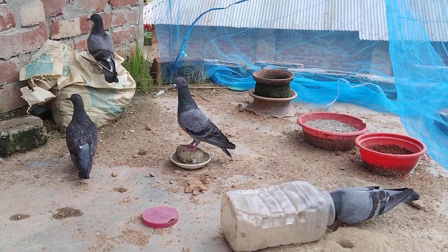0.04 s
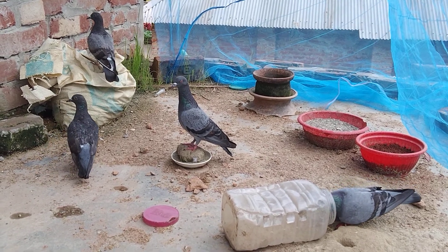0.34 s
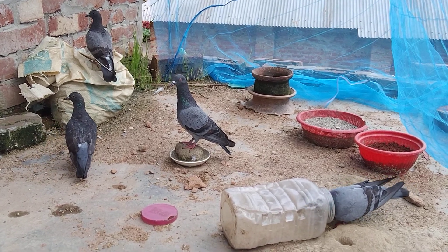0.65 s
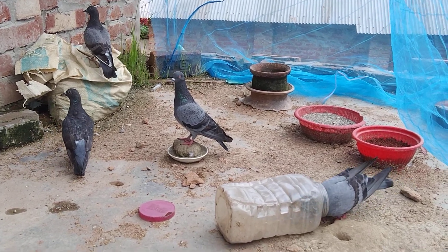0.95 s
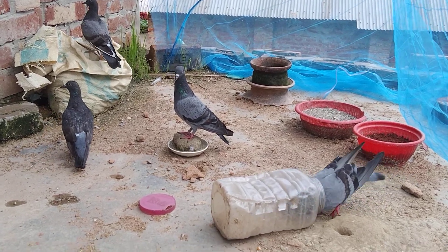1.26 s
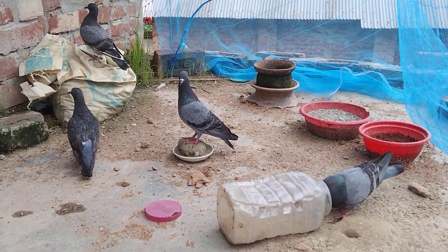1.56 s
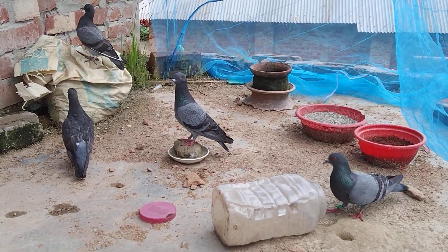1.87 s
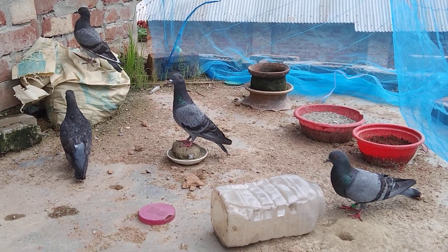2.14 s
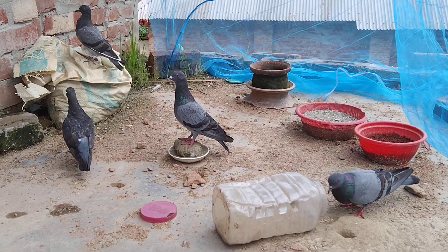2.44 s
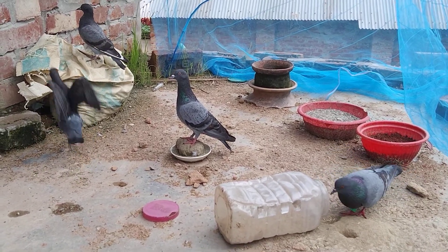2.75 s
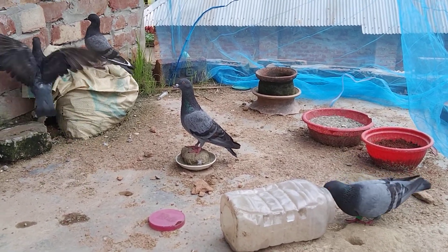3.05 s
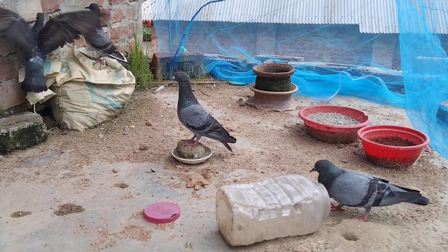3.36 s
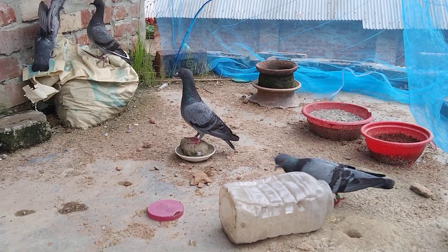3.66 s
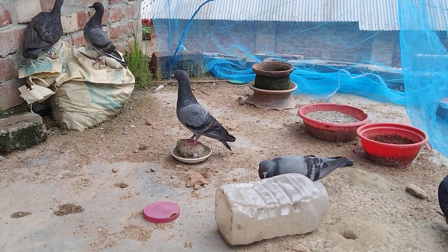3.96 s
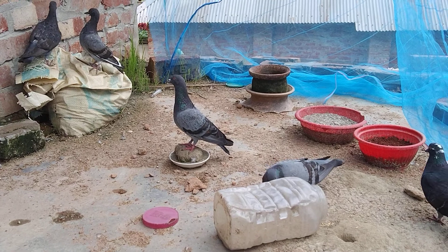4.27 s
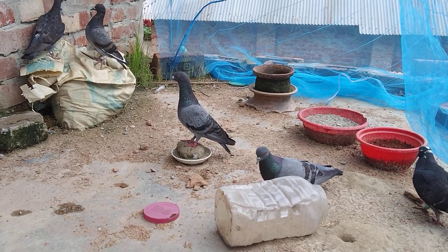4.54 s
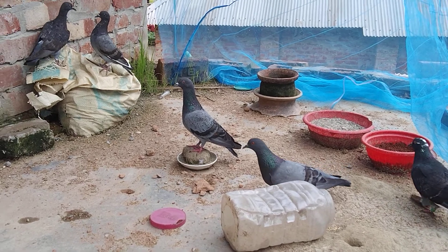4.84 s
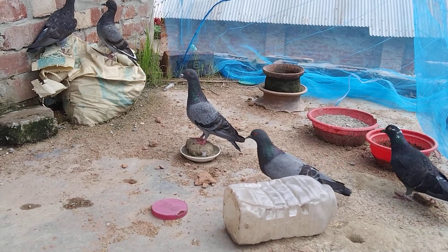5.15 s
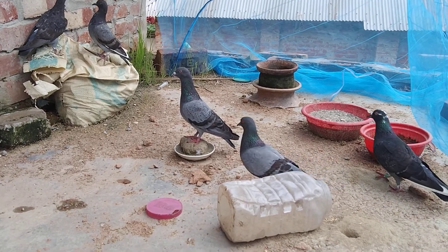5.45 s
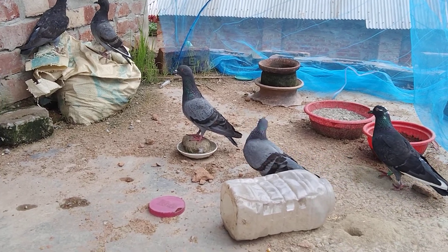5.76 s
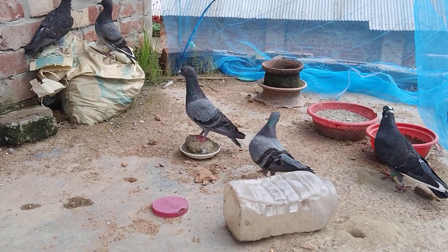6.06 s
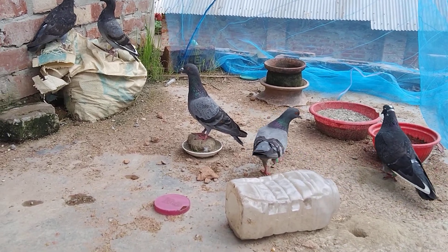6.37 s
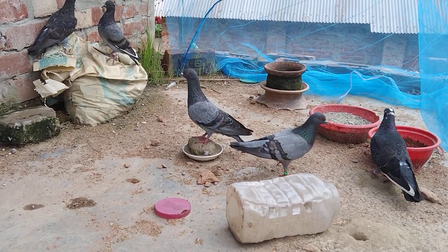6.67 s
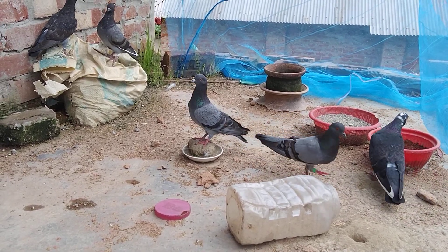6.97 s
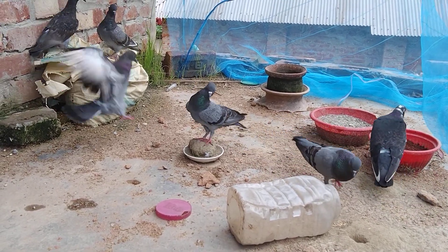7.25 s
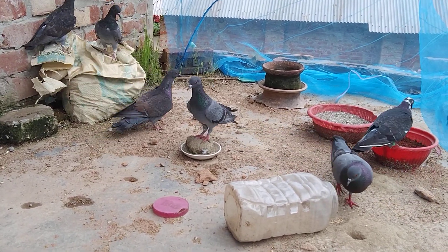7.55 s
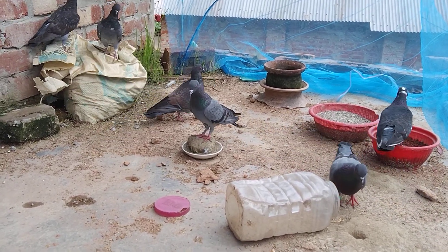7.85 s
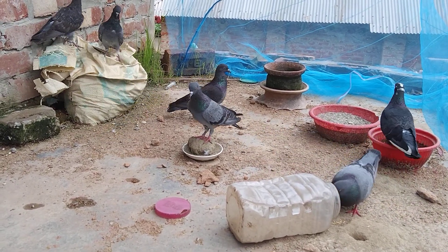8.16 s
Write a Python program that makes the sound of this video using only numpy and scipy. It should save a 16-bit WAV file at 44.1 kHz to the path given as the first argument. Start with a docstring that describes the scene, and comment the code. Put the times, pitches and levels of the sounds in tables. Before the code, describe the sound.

A pigeon rustles softly inside a plastic feed jar and scuffs about in an outdoor yard. A nearby bird gives short rasps, a quick slur and a long falling whistle. Two pigeons fly up in turn close to the microphone, wings swishing and clapping, with light ticks on grain between the flights. The near bird rasps again at the end. Small birds chirp and a slow engine thuds faintly far off throughout.

```python
"""Pigeons in a netted yard. Throughout: a slow one-cylinder engine thuds far off, small birds chirp,
walls echo. First a pigeon pushes into a plastic feed jar and scuffs about. From 2.2 s a near bird
gives rasps, a slur and a long falling whistle. Near 3 s and 6.5 s two pigeons fly up and land:
feathers swish, wings clap, and in the second flight hard downstrokes buzz. Between the flights,
beaks and claws tick on grain. At 8 s the near bird rasps and slurs again."""
import sys
import numpy as np
from scipy import signal
from scipy.fft import rfft, irfft, next_fast_len
from scipy.io import wavfile
from scipy.ndimage import uniform_filter1d

SR = 44100
rng = np.random.default_rng(int(sys.argv[2]) if len(sys.argv) > 2 else 0)


def master(y):
    """Save y as 16-bit WAV."""
    cut = np.clip(np.atleast_2d(y).T, -1, 1)
    pcm = np.round(cut * 32767)  # scale
    wavfile.write(sys.argv[1], SR, pcm.astype(np.int16))


N = 370881
BAND_LIMIT_HZ = 15700

WALL_ECHOES = [(0.012, 1), (0.021, -13), (.031, -24)]  # delay/s, relative level/dB
SUPPRESSOR_THRESHOLD = [(150, -122), (400, -114), (1500, -113), (4000, -114), (8000, -123), (15000, -128)]  # f/Hz, density/dB
CALM_SPECTRUM = [(70, -109), (130, -110), (250, -117), (750, -121), (2000, -120), (3700, -126),
                 (6000, -137), (9000, -150)]  # still yard: f/Hz, density/dB
# pigeons stir: t/s, hold/s, air level/dB, plumage level/dB, air fade/(dB/s), plumage fade/(dB/s)
FLURRIES = [(0.25, 0.19, -68.5, -108, 123, 60), (0.58, 0.51, -79, -83, 59.5, 60),
            (1.268, 0.33, -75.5, -71, 44, 42), (1.99, 0.59, -90.5, -83.5, 66, 88),
            (3.014, 0.28, -63, -63, 64, 23), (6.522, 0.14, -67.5, -64.5, 29, 14.5),
            (7.06, 0.36, -68, -69.5, 67, 54), (8.267, 0.12, -63.5, -69.5, 69, 58)]
AIR_SPECTRUM = [(70, 7.5), (130, 1), (300, 6), (700, -0.5), (1300, -13.5), (2200, -37.5), (5000, -46.5)]  # stirred air: f/Hz, relative level/dB
BRUSH_SPECTRUM = [(300, -10.5), (900, 2.5), (2000, 1.5), (3600, -2), (6300, -2.5), (7300, -2), (9000, -42)]  # soft brush of plumage: f/Hz, relative level/dB
ENGINE_RATE = [(0.0, 6.046), (1.6, 6.023), (2.5, 5.64), (4.0, 5.778), (4.8, 6.068), (5.8, 5.46),
               (7.4, 6.174), (8.4, 5.537)]  # t/s, firing rate/Hz
ENGINE_LEVEL = [(0, -69.5), (.8, -61.5), (1.8, -70), (3.2, -59.5), (4.6, -63.5), (5.8, -66.5), (6.8, -58.5),
                (8.4, -68.5)]  # t/s, base level/dB

CHATTER = [(0, 0.39, 6550, -76.5), (0, 0.18, 3350, -74.5), (0.175, 0.17, 1840, -77.5),
           (1.572, 0.73, 5260, -76), (2.75, 0.48, 2430, -64.5), (3.597, 0.35, 3390, -70.5),
           (3.954, 0.072, 5460, -80.5), (3.637, 0.51, 930, -78.5), (4.635, 0.9, 1670, -81),
           (5.006, 0.058, 5170, -79.5), (4.76, 0.59, 738, -76.5), (5.014, 0.53, 3380, -78),
           (6.009, 0.042, 5620, -85.5), (6.133, 0.11, 322, -76.5), (6.457, 0.044, 303, -66.5),
           (7.56, 0.89, 3380, -75.5), (7.713, 0.575, 2360, -64), (7.822, 0.5, 930, -73)]  # hoarse far birds: t/s, hold/s, centre f/Hz, level/dB
FAR_CALLS = [(0, 0.16, 1354, 1383, -66.5), (0.632, 0.044, 1300, 1330, -78), (1.08, 0.053, 1317, 1300, -61),
             (3.877, 0.187, 1033, 813, -68.5), (4.209, 0.17, 1088, 1153, -73),
             (4.412, 0.045, 1414, 1480, -69.5), (4.7, 0.343, 667.4, 594, -73.5),
             (4.978, 0.45, 1115, 1150, -68.5), (5.773, .06, 3680, 3200, -77),
             (4.911, 0.21, 2552, 2618, -69.5), (7.748, 0.088, 854, 878, -66), (7.72, 0.26, 1850, 1872, -71),
             (7.75, 0.29, 2454, 2470, -70)]  # thin calls: t/s, length/s, start f/Hz, end f/Hz, level/dB
CHIRPS = [(1.661, -57.5), (3.919, -59.5), (5.972, -59), (7.375, -56.5)]  # hoarse chirps: t/s, level/dB
SONGS = [(2.378, -58.5), (3.3, -58.5), (4.166, -58.5), (5.104, -56), (6.287, -59), (7.262, -60.5),
         (8.122, -58.5)]  # small bird's phrases: t/s, base level/dB
# notes of a phrase: delay/s, length/s, start f/Hz, target f/Hz, relative level/dB, roughness/0-1
SONG_NOTES = [(0, 0.05, 5520, 4090, -8.5, 0.1), (0.074, .078, 3887, 2638, -4.5, 0.2)]
OVERTONES = [(1500, -17), (2800, -27.5), (4000, -36), (6000, -49), (8300, -25.5), (9400, -35.5),
             (12000, -55), (14500, -36.5)]  # bird voice: f/Hz, relative level/dB
# near bird's rasps: tip t/s, climb/s, start f/Hz, tip f/Hz, level/dB, tip roughness/0-1
RASPS = [(2.264, 0.06, 1843, 1976, -45, 0.16), (2.403, 0.026, 1910, 1917, -44, 0),
         (2.67, 0.018, 1204, 1510, -39.5, 0), (8.052, .05, 1170, 1928, -45.5, 0.38),
         (8.199, 0.042, 1933, 2083, -46, 0.2)]
SLURS = [(2.475, -34.5), (8.268, -34)]  # near bird's slurs: drop t/s, level/dB
WHISTLE = [(2.681, 1525, -48.5), (2.768, 1483, -57.5), (2.794, 1366, -48.5), (2.846, 1319, -41.5),
           (2.875, 1282, -30), (2.932, 1203, -43.5), (3.0, 1166, -43.5), (3.084, 1171, -37.5),
           (3.115, 810, -47.5), (3.189, 797, -54)]  # near bird's long whistle: t/s, f/Hz, level/dB

RUSTLE_SPECTRUM = [(5000, -23.5), (7300, -2.5), (8500, 0.5), (10500, -3), (13000, -2), (15500, 2.5)]  # fine crackle of plumage: f/Hz, relative level/dB
JAR_RUBS = [(0.071, 0.18, 877, 686, 131, -70.5), (0.059, 0.47, 450, 472.4, 170, -65),
            (0.191, 0.18, 269.5, 219, 110, -66.5), (0.251, 0.33, 1493, 987, 694, -64),
            (0.419, 0.3, 248.7, 244, 92, -63.5), (0.497, 0.18, 444, 381, 120, -69)]  # hollow rustle: t/s, length/s, start f/Hz, end f/Hz, width/Hz, level/dB
SCUFFS = [(.805, -45, 0.0027, 0.018, -1.5), (.836, -48.5, 0.007, 0.018, -1),
          (.932, -53, 0.0012, 0.0098, -1), (1.042, -52.5, 0.0042, 0.067, -2),
          (1.078, -44, 0.0019, 0.0049, -1.5), (1.146, -48.5, 0.00058, 0.021, 1),
          (1.165, -48.5, 0.028, 0.064, 1.5), (1.215, -36, .001, 0.011, -1.5),
          (1.227, -34, 0.00062, 0.013, -1.5), (1.507, -50.5, 0.0037, 0.014, -1.5),
          (4.022, -55, 0.0044, 0.034, -1), (8.35, -41, 0.0033, 0.0086, -1),
          (8.388, -48.5, 0.0052, 0.017, -0.5)]  # on jar and ground: t/s, level/dB, rise/s, decay/s, tilt/(dB/oct)
SCUFF_SPECTRUM = [(71, -74), (120, -53), (230, -20.5), (360, -5), (423, 0), (881, -10.5), (1190, 1),
                  (1300, -6), (1410, 2.5), (2030, -6), (2490, -13), (3730, -6.5), (5490, -21), (7610, -19),
                  (15500, -46)]  # f/Hz, relative level/dB
SCRATCHES = [(.372, -66, 0.032, 0.063, 2.5), (.52, -69.5, 0.012, 0.072, 0),
             (.655, -69.5, 0.0063, 0.069, 2.5), (1.75, -65.5, 0.0073, .025, -7),
             (1.875, -68, 0.0089, 0.053, -2), (2.072, -64, 0.0059, 0.063, -4.5),
             (2.175, -60.5, 0.039, 0.0258, -3), (4.7, -72, 0.011, 0.07, -18), (5.35, -70, 0.032, .02, -20)]  # claws on grit: t/s, level/dB, rise/s, decay/s, tilt/(dB/oct)
SCRATCH_SPECTRUM = [(2600, -27), (4000, 2), (6500, -2.5), (8300, -1), (10500, -17.5), (15500, -30)]  # f/Hz, relative level/dB
GRAIN_TICKS = [(1.079, -43, 0.00058, 1500, 5430), (1.495, -65, 0.0017, 7000, 14400),
               (1.684, -64, 0.0012, 7400, 14500), (4.694, -65.5, 0.007, 4500, 5000),
               (5.15, -63.5, 0.013, 8500, 15200), (5.447, -52, 0.012, 910, 3650),
               (5.448, -63, 0.012, 7300, 8500), (5.545, -67.5, 0.012, 3520, 5400)]  # t/s, level/dB, decay/s, low f/Hz, high f/Hz
DOWNSTROKES = [(6.49, -44.5, 0.037, 683), (6.618, -42.5, 0.049, 770), (6.745, -47, 0.046, 701),
               (6.899, -48, 0.026, 646), (6.927, -51.5, 0.027, 672), (7.057, -51.5, 0.05, 654)]  # t/s, level/dB, length/s, buzz f/Hz
BUZZ_HARMONICS = [2.5, -1.5, -6.5, -16, -15, -16]  # feather buzz, fundamental first: relative level/dB
RUSH_SPECTRUM = [(90, 6.5), (300, 0), (700, -3.5), (1600, 2.5), (2600, -6.5), (4200, -14), (8000, -10),
                 (15500, -51)]  # air of a downstroke: f/Hz, relative level/dB
SWISHES = [(1.32, -50.5, 0.029, 0.037, -2), (2.205, -63.5, 0.046, 0.048, 0.5),
           (2.95, -53, 0.0063, 0.08, -4), (3.003, -46, 0.0039, 0.053, -6),
           (3.062, -41.5, 0.0099, 0.0089, -4), (3.11, -50.5, 0.022, 0.0092, -1),
           (3.2, -53.5, 0.0088, 0.037, 0), (3.245, -49.5, 0.012, 0.012, -7.5),
           (3.405, -60, 0.012, 0.0055, 14), (3.468, -47, 0.00084, 0.0035, -5),
           (3.79, -54.5, 0.024, 0.052, -7), (6.723, -51, 0.0024, 0.0079, 18),
           (6.872, -55, 0.0012, 0.0073, 5), (7.5, -56, 0.0054, 0.01, 16), (8.402, -47.5, 0.0036, 0.012, -2)]  # feathers in air: t/s, level/dB, rise/s, decay/s, tilt/(dB/oct)
SWISH_SPECTRUM = [(200, -36.5), (700, -10.5), (1800, -3.5), (3400, 5), (5500, -2.5), (8000, -1.5),
                  (11000, -10), (15500, -25)]  # f/Hz, relative level/dB
WING_CLAPS = [(3.008, -43, 0.0042, 2920, 4120), (3.069, -46, 0.0029, 3200, 7400),
              (3.169, -43.5, 0.0042, 1120, 1900), (3.185, -37, 0.0021, 3580, 4560),
              (3.262, -41, 0.0016, 2000, 4960), (3.2695, -40, 0.0034, 900, 4890),
              (3.366, -44, 0.0076, 88, 281), (6.569, -46.5, 0.02, 170, 1560),
              (6.592, -34.5, 0.0031, 1220, 3050), (6.724, -51, 0.0081, 700, 2480),
              (6.874, -55.5, 0.013, 985, 2120), (7.0363, -37.5, 0.0025, 610, 1460),
              (7.16, -53, 0.018, 167, 310), (7.215, -49.5, 0.013, 225, 500), (7.31, -54, .014, 160, 390),
              (7.375, -44, 0.0031, 480, 850), (7.409, -52, 0.0071, 166, 398)]  # t/s, level/dB, decay/s, low f/Hz, high f/Hz


def amp(db):
    """Decibels to gain."""
    return 10 ** (np.asarray(db) / 20)


def unit(x):
    """Scale to rms 1."""
    return x / np.sqrt(np.mean(x ** 2) + 1e-20)


def add(mix, at_s, sound):
    """Add a sound into the mix."""
    part = mix[max(round(at_s * SR), 0):][:len(sound)]
    part += sound[:len(part)]


def spectrum_db(spectrum, hz):
    """Interpolate a spectrum over log frequency."""
    points_hz, db = np.transpose(spectrum)
    return np.interp(np.log(hz + 1), np.log(points_hz), db)


def swell_db(t, at_s, hold_s, rise_db_per_s, fade_db_per_s):
    """Rise to 0 dB at at_s, hold, fade."""
    return -rise_db_per_s * np.maximum(at_s - t, 0) - fade_db_per_s * np.maximum(t - at_s - hold_s, 0)


def colour(x, spectrum, tilt_db_per_oct):
    """Filter by a tilted spectrum; 28 dB/oct roll-off below its first point."""
    size = next_fast_len(len(x) + 1024)
    octave = np.log2(np.fft.rfftfreq(size, 1 / SR) + 1)
    hz, db = np.transpose(spectrum)
    above_oct = octave - np.log2(hz[0])
    slope_db = np.where(above_oct > 0, tilt_db_per_oct, 28) * above_oct
    gain = amp(np.interp(octave, np.log2(hz), db) + slope_db)
    return irfft(rfft(x, size) * gain, size)[:len(x)]


def drift(count, *windows):
    """Slow noise, rms 1, smoothed by moving averages; windows in samples."""
    noise = rng.standard_normal(count)
    for size in windows:
        noise = uniform_filter1d(noise, size)
    return unit(noise)


def band_noise(hz, width_hz):
    """Narrow noise band following the curve hz."""
    pole = np.exp(-np.pi * abs(width_hz) / SR)
    white = rng.standard_normal(len(hz)) + 1j * rng.standard_normal(len(hz))
    baseband = signal.lfilter([1], [1, -2 * pole, pole * pole], white)
    return unit((baseband * np.exp(2j * np.pi * np.cumsum(hz) / SR)).real)


def crackle(count, grain_db):
    """Dense, uneven snaps, as of barbs sliding over each other."""
    sizes = np.repeat(np.minimum(rng.exponential(1, count // 16 + 1), 5), 16)[:count]
    return unit(rng.standard_normal(count) * amp(grain_db * sizes))


def echoes(x, walls_db, tail_db, t60_s):
    """Direct sound, single wall echoes, scattered tail."""
    t = np.arange(SR) / SR
    scatter = rng.standard_normal(SR) * (rng.random(SR) < 2000 / SR)
    scatter = scatter * (t > .015) * amp(-60 * t / t60_s)
    response = amp(tail_db) * scatter / np.linalg.norm(scatter)
    response[0] = 1
    for delay_s, db in WALL_ECHOES:
        response[round(delay_s * SR)] += amp(db + walls_db)
    return signal.fftconvolve(x, response)[:N]


def flurry_power(t, air_rise_db_per_s=109, plumage_rise_db_per_s=76):
    """Power of stirred air and plumage: each flurry builds, holds, settles."""
    air, plumage = 0, 0
    for at_s, hold_s, air_db, plumage_db, air_fade, plumage_fade in FLURRIES:
        air += amp(air_db + swell_db(t, at_s, hold_s, air_rise_db_per_s, air_fade)) ** 2
        plumage += amp(plumage_db + swell_db(t, at_s, hold_s, plumage_rise_db_per_s, plumage_fade)) ** 2
    return air, plumage


def yard_air(patch_db=11, flicker_db=1, chatter_width_oct=0.3):
    """Calm air, the wash of each flurry and far chatter, broken into drifting streaks."""
    hz, t, bins = signal.stft(rng.standard_normal(N), SR, nperseg=1024, noverlap=768)
    air, plumage = flurry_power(t)
    layers = [(amp(spectrum_db(AIR_SPECTRUM, hz)) ** 2, air),
              (amp(spectrum_db(BRUSH_SPECTRUM, hz)) ** 2, plumage)]
    for at_s, hold_s, centre_hz, db in CHATTER:
        offset_oct = np.log2((hz + 1) / centre_hz)
        band = np.exp(-.5 * (offset_oct / chatter_width_oct) ** 4) / (1 + (hz / 7000) ** 30)
        level_db = db + swell_db(t, at_s, hold_s, rise_db_per_s=126, fade_db_per_s=112)
        layers.append((band, amp(level_db) ** 2))
    density = sum(np.outer(band / (band.sum() * hz[1]), power) for band, power in layers)
    density += amp(spectrum_db(CALM_SPECTRUM, hz))[:, None] ** 2
    density /= 1 + (70 / (hz[:, None] + 1)) ** 8  # low cut
    patches = uniform_filter1d(rng.standard_normal(bins.shape), size=3, axis=0)
    patches = unit(uniform_filter1d(patches, size=20, axis=1))
    depth_db = patch_db * (hz + 100) / (hz + 300) / (1 + hz / 9000)  # smoother bass and top
    streaks_db = depth_db[:, None] * np.minimum(patches, 1.9) + flicker_db * rng.standard_normal(len(t))
    gain = np.sqrt(density * SR / 2) * amp(streaks_db)
    return signal.istft(bins * gain, nperseg=1024, noverlap=768)[1][:N]


def engine(thud_hz=80, width_s=0.011, uneven_db=2, rumble_db=-9, rumble_hz=125, rumble_decay_s=0.034):
    """Each firing: a soft thud of about two cycles, trailed by scattered rumble."""
    clock_s = np.arange(.025, N / SR, 1 / SR)
    cycles = np.cumsum(np.interp(clock_s, *np.transpose(ENGINE_RATE))) / SR
    lead = SR // 20
    t = np.arange(-lead, SR // 5) / SR
    thud_shape = np.exp(-.5 * (t / width_s) ** 2)
    rumble_shape = np.clip(t / width_s + 1, 0, 1) * np.exp(-abs(t) / rumble_decay_s)
    out = np.zeros(N + SR)
    for at_s in np.interp(np.arange(cycles[-1]), cycles, clock_s):
        hz = thud_hz * rng.uniform(0.83, 1.18)
        thud = thud_shape * np.cos(2 * np.pi * (hz * t + rng.uniform(-0.014, 0.39)))
        rumble = rumble_shape * band_noise(np.full(len(t), rumble_hz), width_hz=34.7)
        db = np.interp(at_s, *np.transpose(ENGINE_LEVEL)) + uneven_db * rng.uniform(0.18, 1)
        add(out, at_s, amp(db) * (thud + amp(rumble_db) * rumble))
    return out[lead:][:N]


def far_calls(width_hz=45):
    """Distance leaves one wavering, blurred partial of each bird call."""
    out = np.zeros(N)
    for at_s, length_s, start_hz, end_hz, db in FAR_CALLS:
        hz = np.linspace(start_hz, end_hz, int(length_s * SR))
        tone = unit(np.sin(2 * np.pi * np.cumsum(hz) / SR) + .75 * band_noise(hz, width_hz))
        add(out, at_s, amp(db) * tone * signal.windows.tukey(len(hz), .5))
    return out


def chirps(length_s=0.15, start_hz=4000, end_hz=3258, rise_db=6,
           width_hz=420, upper_hz=4200, upper_db=-10.5):
    """A thin falling whistle swells, frays into a rasp and clears as it stops."""
    out = np.zeros(N)
    u = np.linspace(0, 1, int(length_s * SR))
    hz = start_hz + (end_hz - start_hz) * u
    tone = np.sin(2 * np.pi * np.cumsum(hz) / SR)
    hoarseness = np.sin(np.pi * u ** 1.23)
    envelope = amp(rise_db * (u - 1)) * signal.windows.tukey(len(u), .16)
    for at_s, db in CHIRPS:
        whistle = (1 - hoarseness) * tone + hoarseness * band_noise(hz, width_hz)
        upper = amp(upper_db) * hoarseness * band_noise(np.full(len(u), upper_hz), width_hz)
        add(out, at_s, amp(db) * envelope * (whistle + upper))
    return out


def bird_note(hz, db, roughness, overtone_db, width_hz=750, jitter=.007, shimmer_db=0.93):
    """Whistle with weak, breathy overtones; roughness turns it into a rasp at the same pitch."""
    waver = drift(len(hz), 110, 60)
    phase = 2 * np.pi * np.cumsum(hz * (1 + jitter * waver)) / SR
    voice = np.zeros(len(hz))
    for k in range(1, 12):
        partial_db = overtone_db + np.interp(k * hz, *np.transpose(OVERTONES))
        gain = 1 if k == 1 else amp(partial_db) * (k * hz < BAND_LIMIT_HZ)
        noisy = np.clip(roughness + 0.078 * (k - 1), 0, 1)  # higher overtones are less pure
        partial = (1 - noisy) * np.sqrt(2) * np.sin(k * phase) + noisy * band_noise(k * hz, width_hz)
        voice += gain * partial / np.hypot(noisy, 1 - noisy)
    return amp(db + shimmer_db * waver) * voice * signal.windows.tukey(len(hz), .04)


def small_bird(edge_db=-2):
    """Repeated two-note phrase; each note swells and fades as its pitch falls and levels out."""
    out = np.zeros(N)
    for at_s, db in SONGS:
        for delay_s, length_s, start_hz, target_hz, note_db, roughness in SONG_NOTES:
            u = np.linspace(0, 1, int(length_s * SR))
            hz = target_hz + (start_hz - target_hz) * np.exp(-4.5 * u)
            level_db = db + note_db + edge_db * (2 * u - 1) ** 2
            add(out, at_s + delay_s, bird_note(hz, level_db, roughness, overtone_db=-3.5, width_hz=394))
    return out


def rasps(rise_db=17.5, tail_s=0.02, start_roughness=0.85, hoarse_hz=1324, hoarse_db=-10.5, low_hz=850):
    """Near bird: rasps clear as they climb, over a hoarse undertone; little sounds below the low cut."""
    out = np.zeros(N)
    highpass = signal.butter(4, low_hz, "highpass", fs=SR, output="sos")
    for tip_s, climb_s, start_hz, tip_hz, db, tip_roughness in RASPS:
        t = np.arange(-climb_s, tail_s, 1 / SR)
        remaining = np.maximum(-t / climb_s, 0)
        hz = tip_hz + (start_hz - tip_hz) * remaining ** 2
        level_db = db + swell_db(t, 0, 0, rise_db / climb_s, fade_db_per_s=896.5)
        roughness = tip_roughness + (start_roughness - tip_roughness) * np.sqrt(remaining)
        voice = bird_note(hz, level_db, roughness, overtone_db=-3)
        undertone = signal.windows.hann(len(t)) * band_noise(np.full(len(t), hoarse_hz), width_hz=280)
        add(out, tip_s - climb_s, signal.sosfilt(highpass, voice + amp(db + hoarse_db) * undertone))
    return out


def slurs(high_hz=1558, low_hz=700.5, drop_s=0.0075, half_s=0.057, peak_lead_s=0.0098):
    """Near bird: a held pitch drops fast, loudest just before the drop."""
    out = np.zeros(N)
    t = np.arange(-half_s, half_s, 1 / SR)
    hz = low_hz + (high_hz - low_hz) / (1 + np.exp(t / drop_s))
    shape_db = swell_db(t, -peak_lead_s, 0, rise_db_per_s=512, fade_db_per_s=599.5)
    for at_s, db in SLURS:
        add(out, at_s - half_s, bird_note(hz, db + shape_db, roughness=0.022, overtone_db=2))
    return out


def long_whistle():
    """Near bird: one whistle sinking step by step."""
    out = np.zeros(N)
    times_s, hz, db = np.transpose(WHISTLE)
    t = np.arange(times_s[0], times_s[-1], 1 / SR)
    voice = bird_note(np.interp(t, times_s, hz), np.interp(t, times_s, db), 0.0304, overtone_db=-3)
    add(out, times_s[0], voice)
    return out


def plumage_rustle(flutter_db=3, gain_db=-.5):
    """Fine feather crackle fluttering through each flurry."""
    flutter = drift(N, 600, 300)
    t = np.arange(N) / SR
    power = np.interp(t, t[::128], flurry_power(t[::128])[1])
    barbs = unit(colour(crackle(N, grain_db=2), RUSTLE_SPECTRUM, tilt_db_per_oct=0))
    return np.sqrt(power) * amp(gain_db + flutter_db * flutter) * barbs


def jar_rustle(flutter_db=1):
    """A pigeon pushes into the jar: soft rubbing in broad, overlapping resonances."""
    out = np.zeros(N)
    for at_s, length_s, start_hz, end_hz, width_hz, db in JAR_RUBS:
        hz = np.linspace(start_hz, end_hz, int(length_s * SR))
        envelope = amp(db - flutter_db * drift(len(hz), 900)) * signal.windows.tukey(len(hz), .8)
        lowpass = signal.butter(4, start_hz + width_hz, fs=SR, output="sos")
        add(out, at_s, envelope * unit(signal.sosfilt(lowpass, band_noise(hz, width_hz))))
    return out


def strokes(rows, spectrum, grain_db):
    """Bursts of crackle: linear rise, exponential decay."""
    out = np.zeros(N)
    for at_s, db, rise_s, decay_s, tilt_db_per_oct in rows:
        t = np.arange(int((rise_s + 7 * decay_s) * SR) + 256) / SR
        envelope = np.minimum(t / rise_s, 1) * np.exp(-np.maximum(t - rise_s, 0) / decay_s)
        friction = unit(colour(crackle(len(t), grain_db), spectrum, tilt_db_per_oct))
        add(out, at_s, amp(db) * envelope * friction)
    return out


def knocks(rows, crack_db, crack_s):
    """Sudden bursts ringing in one band; the brighter the band, the harder the first crack."""
    out = np.zeros(N)
    t = np.arange(SR // 10) / SR
    for at_s, db, decay_s, low_hz, high_hz in rows:
        fade = np.exp(-t / decay_s)
        bandpass = signal.butter(2, [low_hz, high_hz], "bandpass", fs=SR)
        ring = signal.lfilter(*bandpass, fade * rng.standard_normal(len(t)))
        ring *= np.linalg.norm(fade) / np.linalg.norm(ring)
        crack = amp(crack_db) * high_hz / (SR / 2) * np.exp(-t / crack_s) * rng.standard_normal(len(t))
        add(out, at_s, amp(db) * (ring + crack))
    return out


def feeding():
    """Feet and feathers scuff jar and ground, claws scratch grit, beaks and claws tick on grain."""
    scuffs = strokes(SCUFFS, SCUFF_SPECTRUM, grain_db=0.5)
    scratches = strokes(SCRATCHES, SCRATCH_SPECTRUM, grain_db=2.5)
    return scuffs + scratches + knocks(GRAIN_TICKS, crack_db=-13, crack_s=.0005)


def feather_buzz(width_hz=35, sag=0.121, rush_db=-5, roughness=0.58):
    """Hard downstrokes: flight feathers flutter at a rough, sagging pitch in a rush of air."""
    out = np.zeros(N)
    for at_s, db, length_s, mid_hz in DOWNSTROKES:
        u = np.linspace(0, 1, int(length_s * SR))
        hz = mid_hz * (1 + sag * (.5 - u))
        phase = 2 * np.pi * np.cumsum(hz) / SR
        buzz = np.zeros(len(u))
        for k, harmonic_db in enumerate(BUZZ_HARMONICS, 1):
            harmonic = np.sin(k * phase) / k + roughness * band_noise(k * hz, k * width_hz)
            buzz += amp(harmonic_db) * unit(harmonic)
        rush = unit(colour(crackle(len(u), grain_db=3.5), RUSH_SPECTRUM, tilt_db_per_oct=0.44))
        envelope = np.sin(np.pi * u ** 0.66) ** 0.36
        add(out, at_s, amp(db) * envelope * unit(unit(buzz) + amp(rush_db) * rush))
    return out


def wings():
    """Feathers buzz and swish; wings clap together or thump the air."""
    feathers = feather_buzz() + strokes(SWISHES, SWISH_SPECTRUM, grain_db=3)
    return feathers + knocks(WING_CLAPS, crack_db=8, crack_s=.0012)


def scene():
    """Pigeons close by, other birds around, engine and air behind. Mono."""
    flights, feed = wings(), feeding()
    far_birds = small_bird() + chirps() + far_calls()
    mix = echoes(flights, walls_db=-14, tail_db=-11.5, t60_s=0.97)
    mix += echoes(feed, walls_db=-14, tail_db=-16, t60_s=0.55)
    mix += echoes(rasps() + slurs() + long_whistle(), walls_db=-7.5, tail_db=-11.5, t60_s=0.59)
    mix += echoes(far_birds, walls_db=-3, tail_db=-0.5, t60_s=0.61)
    return (mix + jar_rustle() + engine() + yard_air() + plumage_rustle())[None]


def suppress_noise(x, depth_db=9, knee_db=3.5):
    """Turn each narrow band down while faint; quiet sounds come and go in streaks."""
    hz, _, bins = signal.stft(x, SR, nperseg=1024, noverlap=768)
    power = uniform_filter1d(uniform_filter1d(abs(bins) ** 2, size=3, axis=0), size=9, axis=1)
    density_db = 10 * np.log10(abs(power) * 1024 / (.75 * SR) + 1e-20)
    over_db = density_db - spectrum_db(SUPPRESSOR_THRESHOLD, hz)[:, None]
    gain = amp(depth_db * (np.tanh(over_db / knee_db) - 1) / 2)
    return signal.istft(bins * gain, nperseg=1024, noverlap=768)[1][:N]


def record(dry, low_cut_hz=50, hiss_db=-96):
    """Low cut, noise suppression, faint hiss, band limit."""
    sound = signal.lfilter(*signal.butter(3, low_cut_hz, "highpass", fs=SR), dry[0])
    sound = suppress_noise(sound) + amp(hiss_db) * rng.standard_normal(N)
    lowpass = signal.firwin(511, BAND_LIMIT_HZ, window=("kaiser", 9), fs=SR)
    return signal.oaconvolve(sound, lowpass, "same")[None]


dry = scene()
out = record(dry)
master(out)
```